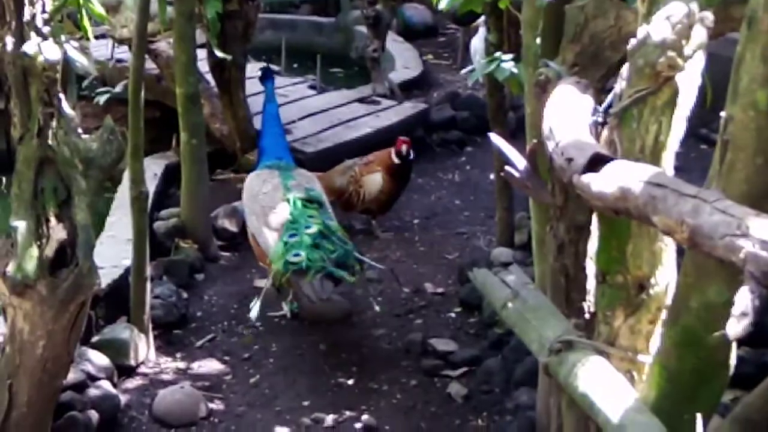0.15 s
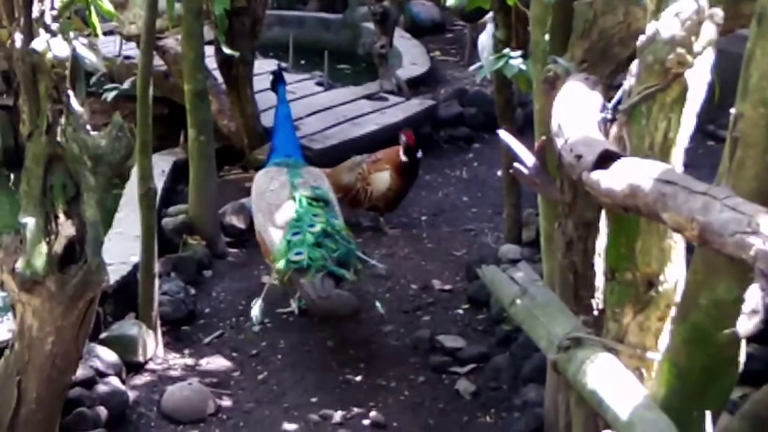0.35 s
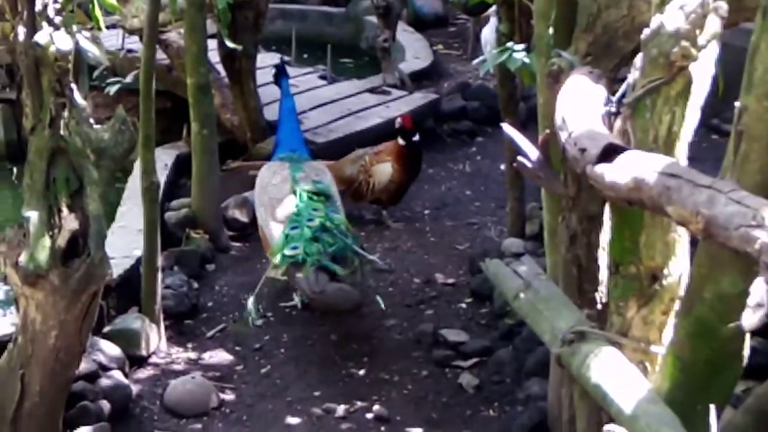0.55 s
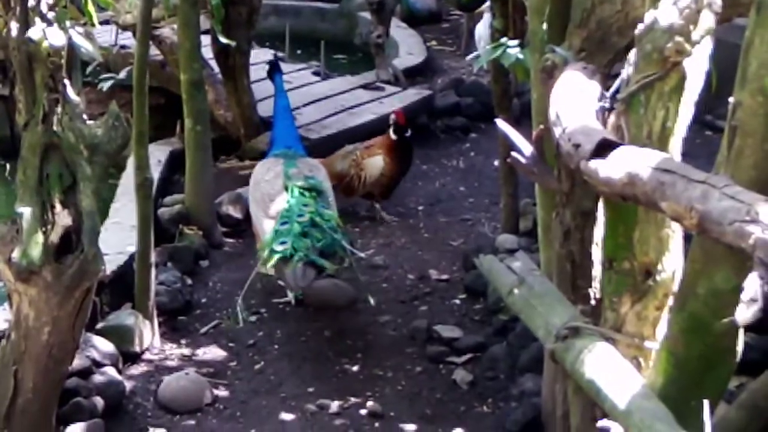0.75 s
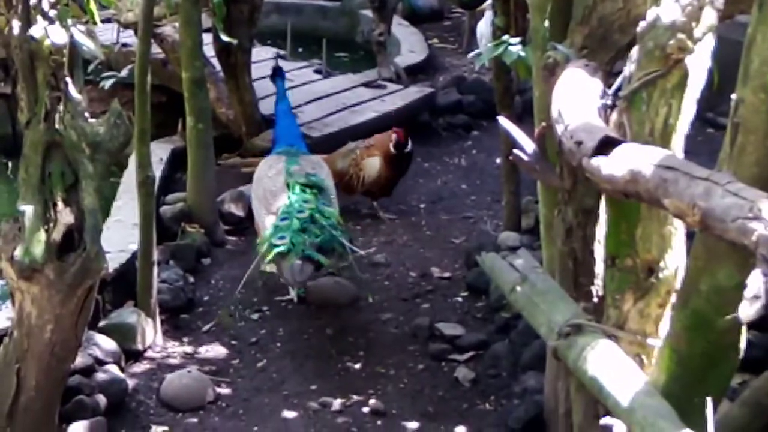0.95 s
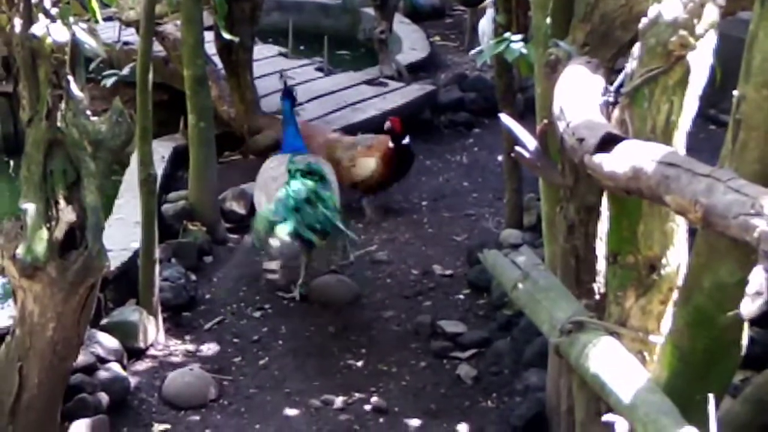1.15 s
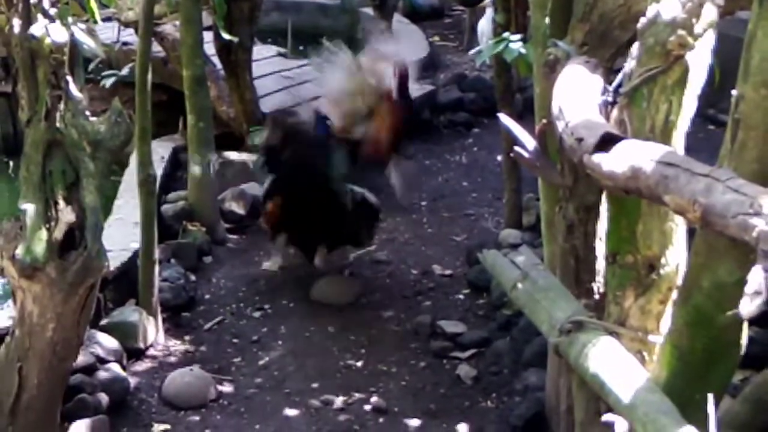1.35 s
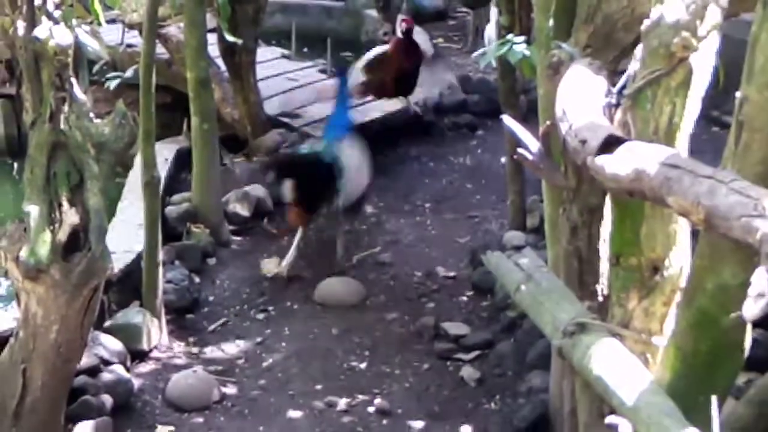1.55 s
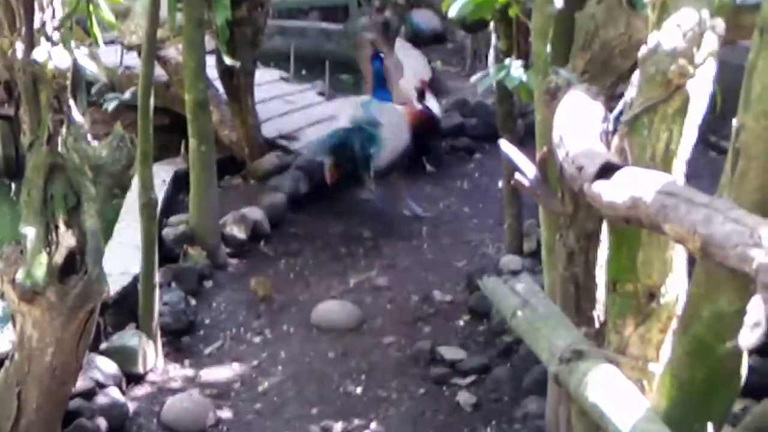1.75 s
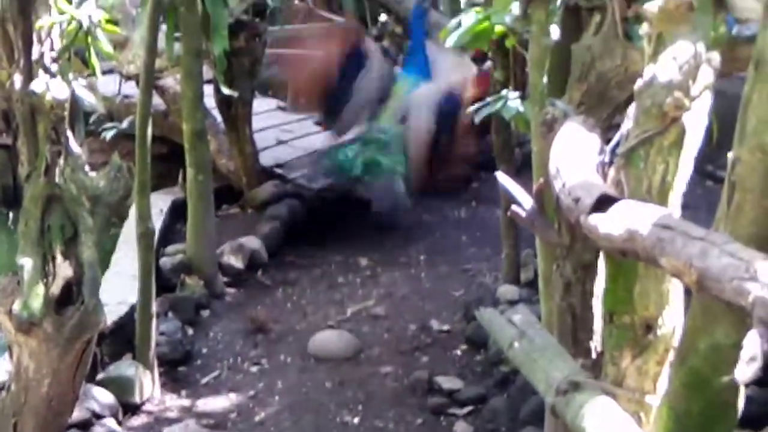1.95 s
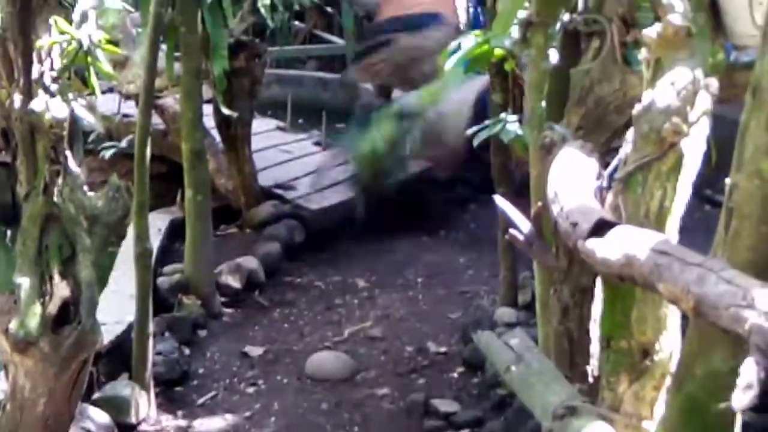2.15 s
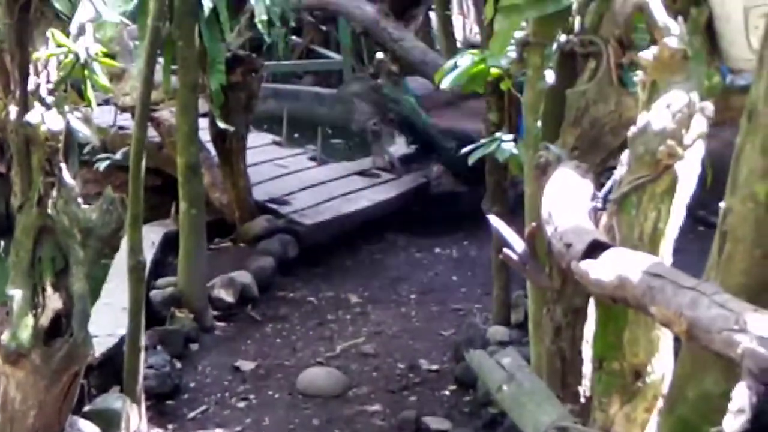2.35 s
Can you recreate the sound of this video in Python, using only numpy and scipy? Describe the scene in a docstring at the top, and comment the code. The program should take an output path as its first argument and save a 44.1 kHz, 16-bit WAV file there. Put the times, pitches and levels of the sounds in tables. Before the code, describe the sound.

Raspy squawks from a quarrelling pheasant and peacock: soft cluck, hiss, loud squawk, long throbbing screech, quick chips, buzzing squeal and honk, then fluttering wings and feet; close, in an outdoor pen with short echo.

```python
"""A pheasant and a peacock quarrel in an outdoor pen: a soft cluck, a hiss, a squawk, a long throbbing
screech, sharp chips, a buzzing squeal and one clean honk, then wings and feet scuffle amid more chips
and a last squeal, over a faint hum. Rasps are uneven throat pulses, air and an unsteady voice through
throat filters; calls are stacks of sine partials; wing and foot strokes are coloured noise bursts.
The pen adds a short noise-tail echo."""
import sys
import numpy as np
from scipy import signal
from scipy.fft import rfft, irfft
from scipy.io import wavfile

SR = 44100
rng = np.random.default_rng(int(sys.argv[2]) if len(sys.argv) > 2 else 0)


def master(y):
    """Save y as 16-bit WAV."""
    cut = np.clip(np.atleast_2d(y).T, -1, 1)
    pcm = np.round(cut * 32767)  # scale
    wavfile.write(sys.argv[1], SR, pcm.astype(np.int16))


N = 105840
T = np.arange(N) / SR

# throat resonances of the screech and squawk rasp: f/Hz, relative level/dB
SCREECH_THROAT_RESPONSE = [(560, -54.5), (900, -16), (1130, 7.5), (1350, -4.5), (1700, -7.5), (1870, 9),
                           (2050, -5), (2200, -1), (2420, -2), (2680, 6), (3250, 1.5), (3500, 2),
                           (3780, 4.5), (4000, -8.5), (4500, -10), (5100, -3.5), (5500, -11), (6000, -44.5),
                           (8000, -46.5), (8450, -24.5), (9100, -41.5), (13000, -72.5)]
# partials of the high tone in screech and squawk: relative level/dB
HIGH_TONE_PARTIALS = [0, -22]


def undb(db):
    """Amplitude ratio from dB."""
    return 10 ** (np.asarray(db) / 20)


def unit(x):
    """Scale to rms 1."""
    return x / np.sqrt(np.mean(x ** 2))


def walk(hz):
    """Smooth noise of rms 1; its spectrum falls off as a Gaussian of width hz."""
    bin_hz = np.arange(N // 2 + 1) * SR / N
    spectrum = rfft(rng.standard_normal(N)) * np.exp(-(bin_hz / hz) ** 2)
    return unit(irfft(spectrum, N))


def colour(x, points, tilt_db=0):
    """Minimum-phase filter through (f/Hz, level/dB) points, tilted in dB per octave; rms 1 out."""
    hz, db = np.array(points, float).T
    octave = np.log2(np.maximum(np.arange(N // 2 + 1) * SR / N, 1))
    below = np.maximum(np.log2(hz[0]) - octave, 0)
    tilted_db = db + tilt_db * np.log2(hz / hz[0])
    shape_db = np.interp(octave, np.log2(hz), tilted_db) - 10 * below
    # folding the cepstrum makes the filter causal
    cepstrum = irfft(np.log(undb(shape_db)), N)
    cepstrum[1:N // 2] *= 2
    cepstrum[N // 2 + 1:] = 0
    return unit(irfft(rfft(x) * np.exp(rfft(cepstrum)), N))


def envelope(rows, fade_s=0.0068):
    """Gain from the first (t/s) and last (level/dB) columns, fading exponentially outside them."""
    t, db = np.array(rows)[:, [0, -1]].T
    outside_s = np.maximum(np.maximum(t[0] - T, T - t[-1]), 0)
    return undb(np.interp(T, t, db)) * np.exp(-outside_s / fade_s)


def bell(at_s, width_s):
    """Gaussian swell centred on a moment."""
    return np.exp(-.5 * ((T - at_s) / width_s) ** 2)


def tone(hz, partials_db, rough, half_db=None, flutter_db=0):
    """Harmonics whose pitch trembles by the share rough, with level flutter and optional half-pitch lines."""
    phase = 2 * np.pi * np.cumsum(hz * (1 + rough * walk(228))) / SR
    gains = undb(partials_db) / np.linalg.norm(undb(partials_db))
    out = 0
    for k, gain in enumerate(gains):
        # the fundamental stays steady, higher partials flutter more
        flutter = undb(flutter_db * min(k / 4, 1) * walk(21.4)) if flutter_db else 1
        out = out + np.sqrt(2) * gain * flutter * np.sin((k + 1) * phase)
    if half_db is not None:
        out = out * (1 + 2 * undb(half_db) * np.cos(phase / 2))
    shimmer_db = np.minimum(70 * rough, 3) * walk(87)
    return out * undb(shimmer_db)


def call(rows, partials_db, rough, half_db=None, flutter_db=0, bend_hz=0):
    """Voiced call: partials follow a pitch and level track."""
    t, hz, _ = np.array(rows).T
    pitch_hz = np.interp(T, t, hz) + bend_hz
    return envelope(rows) * tone(pitch_hz, partials_db, rough, half_db, flutter_db)


def rasp(effort, throat):
    """Uneven slaps of the syrinx, puffs of air and a cracked, lurching voice ring the throat."""
    pulse_hz, pulse_jitter, scatter_db, air_share = 487.3, .25, 2.5, 0.5
    voice_hz, voice_wander, voice_db = 898.4, .085, 1
    flutter_db, flutter_hz = 0.76, 85.6
    phase = np.cumsum(pulse_hz * np.exp(pulse_jitter * walk(400))) / SR  # cycles
    slaps = np.diff(np.floor(phase), prepend=0) * undb(scatter_db * walk(680))
    air = rng.standard_normal(N) * np.exp(-(phase % 1) / 2.1)  # puff decays within each cycle
    lurching_hz = voice_hz * np.exp(voice_wander * walk(69.8))
    voice = tone(lurching_hz, np.zeros(8), rough=.015, flutter_db=2)
    grit = colour(unit(slaps - slaps.mean()) + air_share * unit(air), throat)
    mixed = unit(grit + undb(voice_db) * colour(voice, throat))
    return mixed * undb(flutter_db * walk(flutter_hz)) * envelope(effort)


def buzz(rows, throat, division=1, tilt_db=0):
    """A dense stack of harmonics, on the pitch or a fraction of it, rings the throat."""
    t, hz, _ = np.array(rows).T
    stack = tone(np.interp(T, t, hz) / division, np.zeros(20), rough=0.00485, flutter_db=7.5)
    return envelope(rows) * colour(stack, throat, tilt_db)


def screech():
    """The long screech flips between a low and a high tone some thirty times a second, over two rasps."""
    # throbs, where the voice drops to its low tone: t/s, level/dB
    throbs = [(0.67, -57), (0.697, -50), (.734, -43), (0.766, -41.5), (0.792, -37.5), (0.824, -40.5),
              (0.855, -38), (.885, -38), (0.92, -37), (.954, -41.5), (.98, -46.5), (1.008, -54.5),
              (1.037, -49), (1.067, -54), (1.098, -55), (1.127, -51), (1.158, -58.5), (1.195, -56),
              (1.235, -54)]
    # low-tone partials: relative level/dB
    low_partials = [0, -8, -13.5]
    # high tone between throbs: t/s, f/Hz, level/dB
    high_track = [(.595, 1900, -56), (.65, 1893, -51.5), (.72, 1920, -45), (.85, 1923, -42.5),
                  (1., 1912, -44.5), (1.11, 1876, -48), (1.33, 1820, -65)]
    # rasp effort, main then closing: t/s, level/dB
    main_effort = [(.595, -57), (.645, -44.5), (.73, -46), (.82, -49), (.91, -46), (.97, -48),
                   (1.02, -50.5), (1.06, -54)]
    closing_effort = [(1., -55), (1.04, -48), (1.15, -47.5), (1.22, -47.5), (1.28, -49), (1.34, -57),
                      (1.38, -78.5)]
    # closing throat resonances: f/Hz, relative level/dB
    closing_throat = [(560, -51), (841, -15.5), (1130, -2.5), (1600, -14), (1830, 3), (2100, -11),
                      (2430, -6.5), (2640, 0.5), (3190, -6), (3510, 1), (4090, -18), (5120, -7.5),
                      (5760, -55), (6500, -45.5), (6870, -27.5), (7800, -39), (9500, -66)]
    low_hz, low_rough, throb_width_s = 1107, 0.026, 0.0038
    duck_db, sag_hz, sag_width_s = -26, 149, 0.006  # high tone dips and bends down at each throb
    strength = undb([db for _, db in throbs])
    swells = np.array([bell(at_s, throb_width_s) for at_s, _ in throbs])
    flips = np.array([bell(at_s, sag_width_s) for at_s, _ in throbs])
    low = strength @ swells * tone(np.full(N, low_hz), low_partials, low_rough)
    dip_db = duck_db * np.sqrt(strength / strength.max()) @ flips
    bend_hz = -sag_hz * flips.sum(axis=0)
    high = call(high_track, HIGH_TONE_PARTIALS, rough=0.008, bend_hz=bend_hz) * undb(dip_db)
    rasps = rasp(main_effort, SCREECH_THROAT_RESPONSE) + rasp(closing_effort, closing_throat)
    return low + high + rasps


def threats():
    """A soft falling cluck, a hoarse hiss and a loud squawk that starts on its high tone."""
    # cluck, squawk and squawk onset: t/s, f/Hz, level/dB
    cluck_track = [(.093, 457.8, -66.5), (.125, 443.5, -60.5), (.155, 403, -68)]
    squawk_track = [(.44, 1169, -62), (.452, 1205, -47.5), (.463, 1026, -84.5), (.478, 1038, -45.5),
                    (.487, 1169, -33.5), (.503, 1224, -34), (.519, 1174, -32), (.525, 1065, -51)]
    crack_track = [(.438, 1790, -63), (.457, 1810, -47), (.469, 2000, -47.5)]
    # squawk partials: relative level/dB
    squawk_partials = [2.7, -12.5, -11]
    # throat resonances of cluck, hiss and thin sizzle: f/Hz, relative level/dB
    cluck_throat = [(600, -28), (880, 3.5), (1300, 0), (1700, -23), (2550, -1.5), (3200, -16.5),
                    (6200, -20.5), (7000, -50)]
    hiss_throat = [(720, -42), (890, -8.5), (992, -19.5), (1140, 3.5), (1290, -9.5), (1730, -9.5),
                   (1880, 6.5), (2090, -3), (2620, 1), (2870, -5), (3120, 1.5), (4100, -34), (4550, -24),
                   (5600, -45.5), (9000, -65.5)]
    sizzle_throat = [(5900, -35), (6400, 2), (7400, -11), (8600, -30), (9500, -21.5), (13000, -57)]
    # rasp effort of hiss, sizzle and squawk: t/s, level/dB
    hiss_effort = [(.17, -53), (.188, -49.5), (.25, -45.5), (.32, -49), (.37, -54.5), (.41, -63),
                   (.44, -82.5)]
    sizzle_effort = [(.17, -76.5), (.2, -65), (.25, -63.5), (.295, -65.5), (.34, -97)]
    squawk_effort = [(.432, -67.5), (.455, -44.5), (.478, -50.5), (.5, -46), (.535, -47), (.56, -57.5),
                     (.595, -63)]
    cluck_rasp_db = -3
    cluck = buzz(cluck_track, cluck_throat) + undb(cluck_rasp_db) * rasp(cluck_track, cluck_throat)
    hiss = rasp(hiss_effort, hiss_throat) + rasp(sizzle_effort, sizzle_throat)
    squawk = call(squawk_track, squawk_partials, rough=0.004, flutter_db=4.5)
    crack = call(crack_track, HIGH_TONE_PARTIALS, rough=0.02)
    return cluck + hiss + squawk + crack + rasp(squawk_effort, SCREECH_THROAT_RESPONSE)


def alarm():
    """Short rising chips, a chattering rasp and two squeals with half-pitch lines, the first one buzzing."""
    # chatter effort: t/s, level/dB
    chatter_effort = [(1.285, -74.5), (1.305, -47.5), (1.36, -57.5), (1.42, -60), (1.495, -48.5),
                      (1.53, -47), (1.56, -51.5), (1.59, -52.5), (1.635, -65.5)]
    # chatter throat resonances: f/Hz, relative level/dB
    chatter_throat = [(650, -27.5), (900, -16), (1690, -14), (1900, -7.5), (2490, -9), (3630, -10),
                      (4090, -18), (6870, -35), (8400, -47), (12000, -54)]
    # chips: t/s, f/Hz at centre, level/dB
    chips = [(1.305, 3450, -49.5), (1.342, 3500, -51), (1.379, 3570, -49), (1.411, 3320, -47),
             (1.44, 3330, -51.5), (1.984, 3280, -49.5), (2.014, 3200, -53.5), (2.045, 3310, -50.5),
             (2.07, 3200, -44.5)]
    # squeals: t/s, f/Hz, level/dB
    first_track = [(1.505, 1763, -55.5), (1.525, 1830, -47.5), (1.55, 1709, -42.5), (1.575, 1660, -52),
                   (1.6, 1520, -62.5)]
    last_track = [(2.06, 1572, -62), (2.077, 1582, -56.5), (2.088, 1554, -61), (2.105, 1522, -48.5),
                  (2.125, 1510, -48), (2.147, 1405, -48.5), (2.165, 1463, -58.5)]
    # partials of chips and squeals: relative level/dB
    chip_partials = [0, -26]
    first_partials = [-22, 17.5, -14, -8]
    last_partials = [-10, -5, -10, -17, -32.5]
    chip_width_s, chip_rise_hz_per_s = 0.0041, 47000
    half_db, buzz_db, buzz_division = -19, 1, 4.5
    out = rasp(chatter_effort, chatter_throat)
    for at_s, hz, db in chips:
        pitch_hz = hz + chip_rise_hz_per_s * np.clip(T - at_s, -2 * chip_width_s, 2 * chip_width_s)
        out = out + undb(db) * bell(at_s, chip_width_s) * tone(pitch_hz, chip_partials, rough=.06)
    first = call(first_track, first_partials, rough=0.036, half_db=half_db)
    harsh = undb(buzz_db) * buzz(first_track, chatter_throat, buzz_division, tilt_db=10.0)
    last = call(last_track, last_partials, rough=0.0199, half_db=half_db, flutter_db=4.5)
    return out + first + harsh + last


def honk():
    """One clean note that trembles and cracks at its end."""
    # note and its crack: t/s, f/Hz, level/dB
    note_track = [(1.565, 908, -54.5), (1.61, 901.4, -49), (1.685, 893.3, -46), (1.728, 882, -45.5),
                  (1.768, 891, -57)]
    break_track = [(1.727, 1050, -67), (1.74, 993, -47), (1.77, 892, -53)]
    # partials of each: relative level/dB
    note_partials = [-1.5, 1, 6.5, -15, -18.5, -32.5, -10, -26.5, -33.5]
    break_partials = [14, 1, 2.5, -9]
    # pitch tremble: t/s, depth/dB re starting pitch
    tremble_depth = [(1.71, -52), (1.735, -39.5), (1.78, -40)]
    tremble_hz = note_track[0][1] * envelope(tremble_depth) * walk(170)
    note = call(note_track, note_partials, rough=0.0022, flutter_db=3.0, bend_hz=tremble_hz)
    return note + call(break_track, break_partials, rough=0.0613)


def grunts():
    """Soft low notes, falling in pitch, under the louder calls."""
    # grunts: t/s, f/Hz at centre, level/dB
    notes = [(0.906, 743, -67.5), (1.192, 790, -59)]
    width_s, sag_hz_per_s = 0.016, 1100
    out = 0
    for at_s, hz, db in notes:
        pitch_hz = hz - sag_hz_per_s * (T - at_s)
        out = out + undb(db) * bell(at_s, width_s) * tone(pitch_hz, [0], rough=0.0285)
    return out


def scuffle():
    """Feathers and feet brush past: fluttering noise strokes, each with its own random resonances."""
    # wing strokes and scuffs: t/s, level/dB, decay/s, treble tilt/(dB/octave)
    strokes = [(1.783, -52, 0.032, 0.5), (1.848, -53, 0.012, -3.5), (1.875, -51.5, 0.041, -0.5),
               (1.984, -57.5, 0.039, 4.5), (2.015, -53, 0.05, 2), (2.046, -51.5, 0.018, 9.5),
               (2.078, -47.5, 0.057, 9), (2.354, -54, 0.17, -0.5)]
    # common stroke spectrum: f/Hz, relative level/dB
    scuff_spectrum = [(400, -5.5), (904, -26), (1300, -6), (1940, -6.5), (3440, 2.5), (4280, -7),
                      (6680, -24), (8400, -44.5), (12000, -62.5)]
    attack_s, grain_db, flutter_db, flutter_hz, resonance_db = 0.0076, 1.5, 2.5, 85, 4
    bands_hz = np.geomspace(800, 8000, 24)
    taper = signal.windows.tukey(len(bands_hz))
    out = 0
    for at_s, db, decay_s, tilt_db in strokes:
        grain_level_db = grain_db * walk(500) + flutter_db * walk(flutter_hz)
        grain = rng.standard_normal(N) * undb(grain_level_db)
        bands_db = resonance_db * rng.standard_normal(len(bands_hz)) * taper
        ringing = colour(grain, np.column_stack([bands_hz, bands_db]))
        stroke = np.exp(-np.maximum(at_s - T, 0) / attack_s - np.maximum(T - at_s, 0) / decay_s)
        out = out + undb(db) * stroke * colour(ringing, scuff_spectrum, tilt_db)
    return out


def pen(x):
    """Scattered echoes from trunks, rocks and boards: a delayed, exponentially decaying noise tail."""
    echo_db, t60_s, delay_s = -10.5, 0.21, 0.0059
    tail = rng.standard_normal(N) * np.exp(-np.log(1000) * T / t60_s) * (T > delay_s)
    return x + undb(echo_db) * signal.fftconvolve(x, tail / np.linalg.norm(tail))[:N]


def background():
    """Faint outdoor air as coloured noise, and a hum that wavers in pitch and level."""
    # air noise spectrum: f/Hz, relative level/dB
    air_spectrum = [(30, -40), (118, -12), (200, -16.5), (700, -20), (1200, -30.5), (4040, -33),
                    (9500, -43)]
    air_db, hum_hz, hum_db, waver_db = -76.5, 148.5, -78.5, 4
    level_db = hum_db + waver_db * walk(8.9)
    hum = tone(hum_hz * (1 + 0.014 * walk(9.2)), [0], rough=0.0066) * undb(level_db)
    return hum + undb(air_db) * colour(rng.standard_normal(N), air_spectrum)


def scene():
    """The birds echo in their pen, over the background."""
    birds = screech() + threats() + alarm() + honk() + grunts() + scuffle()
    return (pen(birds) + background())[None]


def record(dry):
    """A steep elliptic low-pass cuts the top."""
    top_hz = 15700
    return signal.sosfilt(signal.ellip(8, .2, 70, top_hz, fs=SR, output="sos"), dry)


dry = scene()
out = record(dry)
master(out)
```